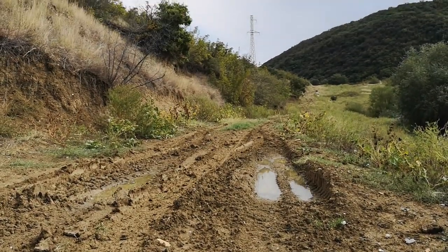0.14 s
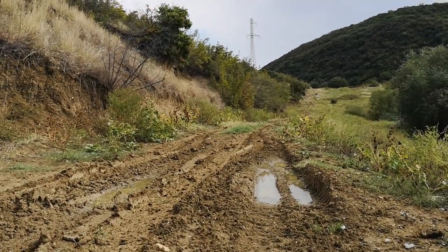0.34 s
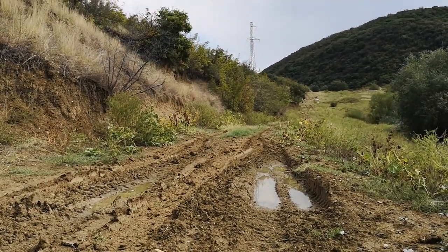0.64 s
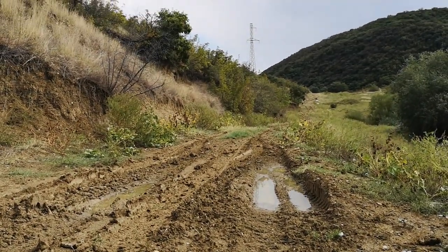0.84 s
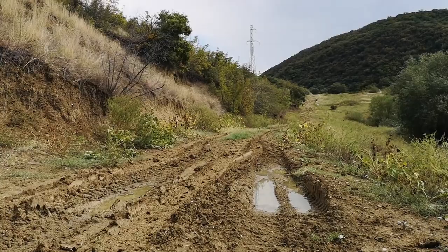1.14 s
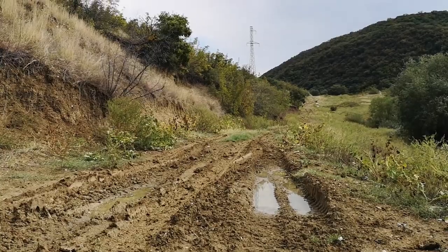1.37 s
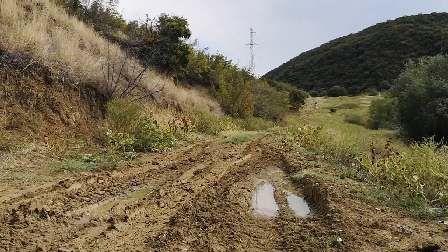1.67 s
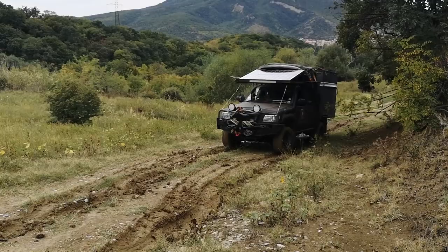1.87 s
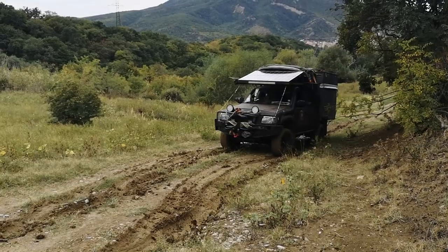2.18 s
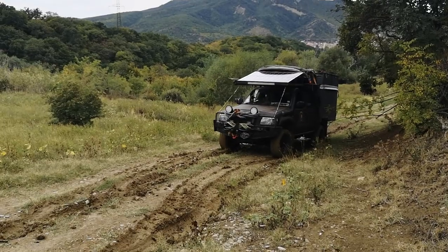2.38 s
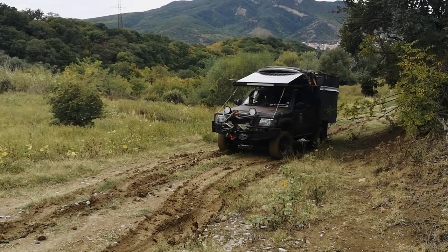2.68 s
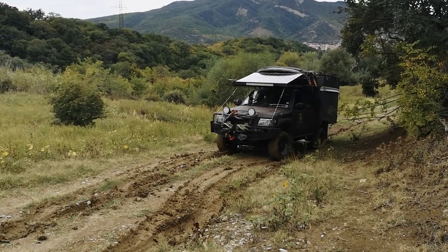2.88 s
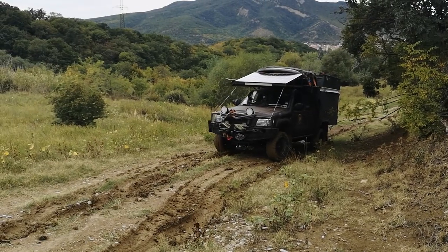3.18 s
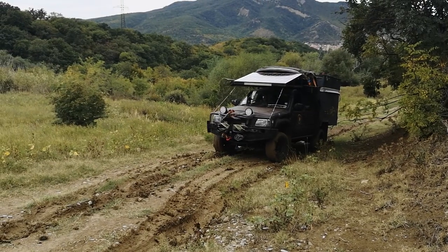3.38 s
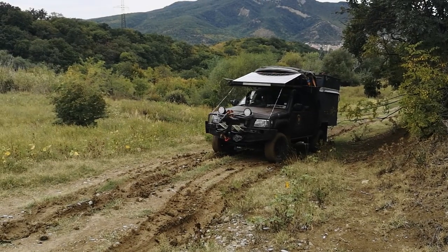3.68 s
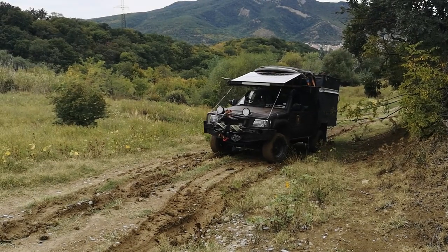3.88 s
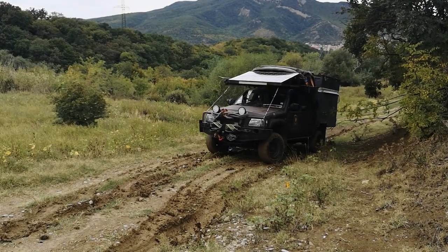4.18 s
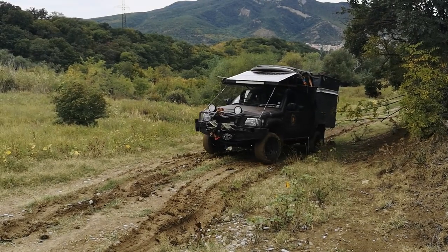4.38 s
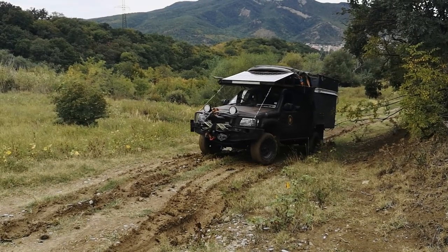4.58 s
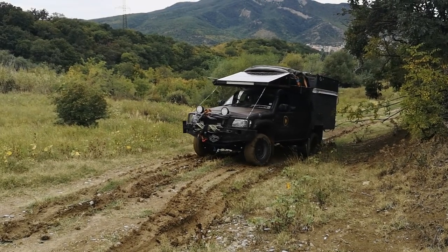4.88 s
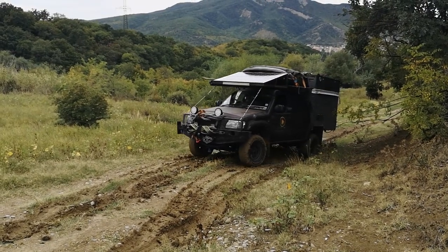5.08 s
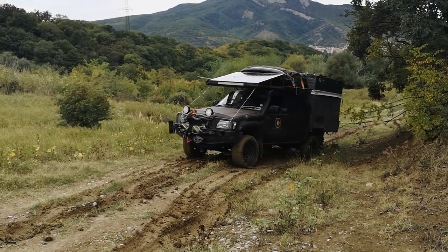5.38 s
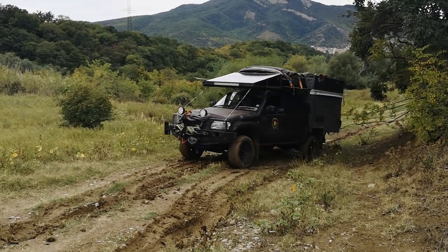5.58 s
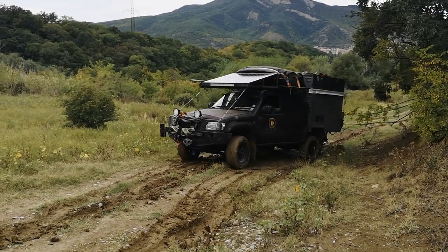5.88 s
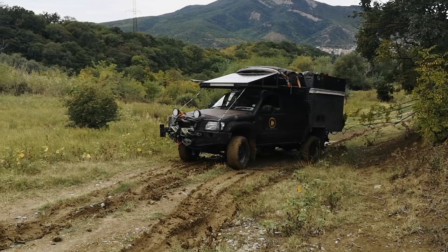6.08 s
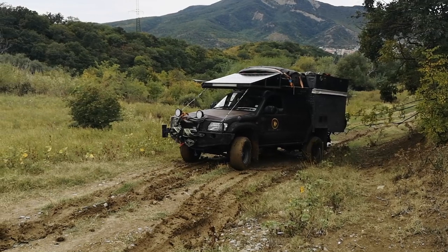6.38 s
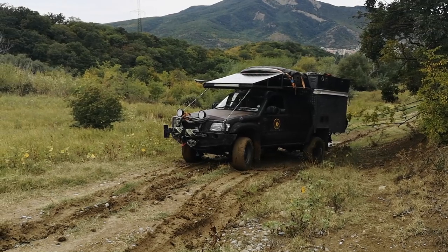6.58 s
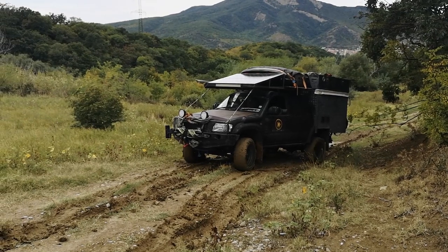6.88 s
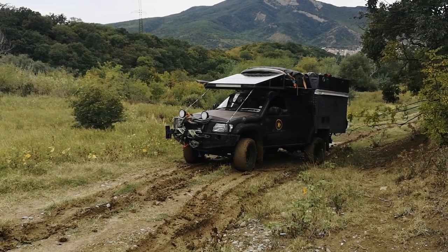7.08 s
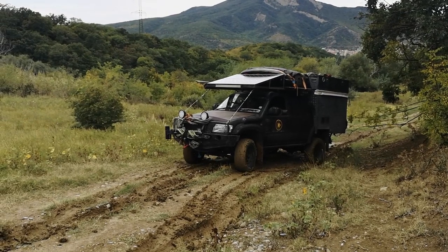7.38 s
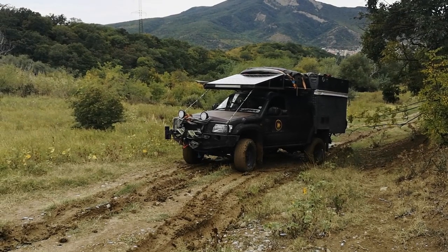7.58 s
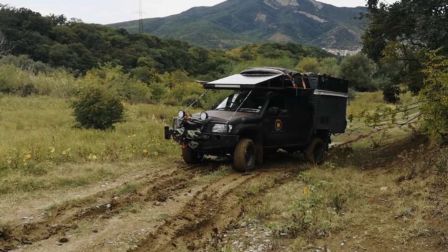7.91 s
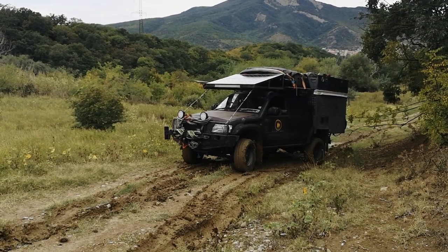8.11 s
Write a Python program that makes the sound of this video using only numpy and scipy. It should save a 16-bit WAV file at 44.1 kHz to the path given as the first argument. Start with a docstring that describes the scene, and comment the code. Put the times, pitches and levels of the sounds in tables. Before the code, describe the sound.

Crickets chirp rapidly in a quiet hill meadow, with a faint distant bird and soft gusts on the microphone. After about two seconds the meadow cuts off and a diesel truck fades in, rumbling and knocking as it labours along a muddy track. Midway its suspension squeaks and scrapes sharply, then small twigs snap under the wheels. The engine sags, picks up again and drops at the end, over low wind buffeting.

```python
"""Crickets chirp in a hill meadow, with a far bird and gusts on the microphone. At 1.9 s the meadow stops
and a diesel truck fades in, labouring through muddy ruts. Wing strokes and bird notes are gliding sines.
The firing rate drives exhaust tones, combustion knock, valve ticks and gear whine, over a noise rumble.
The suspension sticks and slips in squeaks and scrapes; twigs snap under the wheels."""
import sys
import numpy as np
from scipy import signal
from scipy.fft import rfft, irfft
from scipy.io import wavfile
from scipy.ndimage import uniform_filter1d

SR = 44100
rng = np.random.default_rng(int(sys.argv[2]) if len(sys.argv) > 2 else 0)


def dump_mix(stems):
    """Bounce the given channels to the path in sys.argv[1] as a 16-bit WAV at rate SR."""
    frames = np.atleast_2d(stems).T  # one column per channel
    limited = np.clip(frames, -1, 1)  # hard clip at full scale
    pcm = np.round(limited * 32767).astype(np.int16)
    wavfile.write(sys.argv[1], SR, pcm)


N = 363825
T = np.arange(N) / SR
HZ = np.maximum(np.arange(N // 2 + 1) * SR / N, 1)
MEADOW_END_S = 1.926

# Stereo image of each scene's noise. Each row: frequency in Hz, left-right correlation.
MEADOW_CORRELATION = [(60, 0.98), (160, 0.89), (440, -0.47), (1190, -0.18), (3240, -0.13), (8770, 0.04)]
TRUCK_CORRELATION = [(60, 0.97), (160, 1), (440, 0.9), (1190, 1), (2000, 0.88), (3240, 0.12), (8770, 0.03)]


def from_db(db):
    return 10 ** (np.asarray(db) / 20)


def unit_rms(x):
    return x / np.sqrt(np.mean(x ** 2) + 1e-20)


def in_time(rows):
    """One curve per column, interpolated over the seconds in the first."""
    times_s, *columns = np.transpose(rows)
    return [np.interp(T, times_s, column) for column in columns]


def at_hz(rows, hz=HZ):
    """Table interpolated over log frequency, by default at every FFT bin."""
    rows = np.array(rows)
    return np.interp(np.log(hz), np.log(rows[:, 0]), rows[:, 1])


def bell(centre_s, width_s):
    return np.exp(-((T - centre_s) / width_s) ** 2)


def drift(rate_hz):
    """Slow random wander, rms 1."""
    pole = np.exp(-80 * np.pi * rate_hz / SR)
    slow = signal.lfilter([1], [1, -2 * pole, pole * pole], rng.standard_normal(N // 40 + 2002))[2000:]
    return np.interp(np.arange(N) / 40, np.arange(len(slow)), unit_rms(slow))


def smooth_noise(shape, samples, passes=1):
    """White noise through moving averages."""
    noise = rng.standard_normal(shape)
    for _ in range(passes):
        noise = uniform_filter1d(noise, size=samples)
    return noise


def resonance(x, hz, *widths_hz):
    """Two-pole band-passes in series, one per width."""
    for width_hz in widths_hz:
        r = np.exp(-np.pi * width_hz / SR)
        gain = (1 - r * r) / 2
        x = signal.lfilter([gain, 0, -gain], [1, -2 * r * np.cos(2 * np.pi * hz / SR), r * r], x)
    return x


def stereo_noise(spectrum, correlation, gate=1):
    """Noise, gated and then coloured, partly correlated between the ears; mid rms 1."""
    mid, side = rfft(gate * rng.standard_normal((2, N))) * from_db(at_hz(spectrum))
    alike = np.clip(at_hz(correlation), -.99, .995)
    pair = irfft(np.sqrt(1 + alike) * mid + np.sqrt(1 - alike) * side * [[1], [-1]], N)
    return pair / np.std(pair.mean(0))


def note(start_s, length_s, hz, end_hz, db, rough, lean=0.54, arch=0., jitter=0.):
    """Slice and samples of a gliding sine. Lean over 1 peaks late; arch sags the pitch at both ends."""
    u = np.arange(int(length_s * SR)) / (length_s * SR)
    wobble = 1 + rough * unit_rms(smooth_noise(len(u), 70, passes=2))
    pitch_hz = (hz + (end_hz - hz) * u) * (1 - arch * (2 * u - 1) ** 2)
    pitch_hz *= 1 + jitter * unit_rms(smooth_noise(len(u), 120))
    tone = np.sin(2 * np.pi * np.cumsum(pitch_hz) / SR + rng.uniform(0, 5.5))
    first = max(int(start_s * SR), 0)
    return slice(first, first + len(u)), from_db(db) * np.sin(np.pi * u ** lean) * wobble * tone


def octave(tone, gain_db):
    """A squared tone, less its slow part, sounds an octave up."""
    return 2 * from_db(gain_db) * (tone ** 2 - uniform_filter1d(tone ** 2, size=18))


def slope_echo(x, samples, decay_s):
    """The hillside smears a call into a stereo tail."""
    response = rng.standard_normal((2, samples)) * np.exp(-np.arange(samples) / (decay_s * SR))
    return signal.fftconvolve(x[None], response)[:, :N]


def gust_gain(breeze_db):
    """Wind strength: a steady breeze plus bell-shaped gusts."""
    # Each row: centre in seconds, width in seconds, peak in dB.
    gusts = [(.08, 0.033, -49), (0.271, 0.042, -38), (.5, 0.074, -57), (0.633, 0.045, -38),
             (.8, 0.082, -51), (.99, 0.053, -48.5), (3.7, 0.35, -57.5), (4.6, 0.18, -44), (5.1, 0.14, -40),
             (5.6, 0.21, -39), (6.2, 0.073, -36), (7.0, 0.42, -44), (7.9, 0.29, -51), (8.22, 0.18, -29.5)]
    return from_db(breeze_db) + sum(from_db(db) * bell(s, width_s) for s, width_s, db in gusts)


def meadow_wind():
    """Wind buffets the microphone with a fluttering rumble."""
    # Each row: frequency in Hz, relative density in dB.
    spectrum = [(8, -17), (18, 13), (30, -6.5), (50, -0.5), (87, -10), (141, -33), (281, -60), (520, -74)]
    return gust_gain(breeze_db=-59) * from_db(2.2 * drift(12)) * stereo_noise(spectrum, MEADOW_CORRELATION)


def still_air():
    """Steady hush of air and a far insect chorus."""
    # Each row: frequency in Hz, relative density in dB.
    spectrum = [(88, -9), (150, -3.5), (420, -14), (980, -17.5), (1920, -15), (3220, -20.5), (4100, -21.5),
                (4600, -7), (5300, -23.5), (9220, -28.5), (12000, -33.5), (16000, -50)]
    return from_db(-70.5) * stereo_noise(spectrum, MEADOW_CORRELATION)


def near_cricket():
    """Each wing stroke is almost a sine, higher when stronger."""
    # Each row: last stroke of a chirp in seconds, base level in dB.
    chirps = [(0.16, -47.5), (0.5392, -45), (0.8194, -47.5), (1.1087, -49), (1.422, -48.5), (1.7286, -46.5),
              (2.009, -46)]
    # Each row: lead on the last stroke in seconds, gain in dB, octave relative to the stroke in dB.
    strokes = [(.108, -12, -15), (.074, -1.5, -36), (0.042, 2, -45), (0.0026, 2.5, -45)]
    out = np.zeros((2, N))
    for last_s, chirp_db in chirps:
        for lead_s, gain_db, octave_db in strokes:
            s, db = last_s - lead_s, chirp_db + gain_db
            hz = 4972 - (db + 42.5) ** 2
            span, stroke = note(s - .007, .023, hz * .992, hz * 1.004, db, rough=.06, lean=1.3, arch=.05)
            out[:, span] += stroke * from_db([[4.5], [-11]]) + octave(stroke, octave_db - db)
            span, wing_flutter = note(s - .004, .02, hz * .97, hz * .93, db - 13, rough=.55)
            out[:, span] += wing_flutter
    return out


def far_crickets():
    """Three singers; a chirp swells through four wing strokes, each falling in pitch."""
    # Each row: first chirp's end in seconds, period in seconds, pitch in Hz, level in dB,
    # swell in dB per second, left over right in dB.
    even_singers = [(.32, .346, 4640, -66.5, 4, 0.5), (0.175, .345, 4110, -72, -3.5, 11.5)]
    # A deep singer's uneven chirps. Each row: last stroke in seconds, level in dB.
    deep_chirps = [(.33, -70), (.615, -66), (.94, -66), (1.34, -71), (1.725, -72)]
    chirps = [(s, hz, db + swell_db_per_s * s + rng.normal(0, 3.1), pan_db)
              for first_s, period_s, hz, db, swell_db_per_s, pan_db in even_singers
              for s in np.arange(first_s, MEADOW_END_S + period_s, period_s)]
    chirps += [(s, 3930, db, 0) for s, db in deep_chirps]
    out = np.zeros((2, N))
    for last_s, hz, db, pan_db in chirps:
        for back in range(4):
            start_s, stroke_db = last_s - .014 - .0385 * back, db - .38 * back ** 2
            span, stroke = note(start_s, .0374, hz * 1.035, hz * .955, stroke_db, rough=.6, jitter=.008)
            if hz < 4300:
                stroke += octave(stroke, -14 - db)
            out[:, span] += stroke * from_db([[pan_db / 2], [-pan_db / 2]])
    return out


def bird():
    """Raspy whistles glide to a turning pitch and on, echoing off the slope."""
    # Each row: start and length in seconds, start, turning and end pitch in Hz, level in dB.
    notes = [(0.107, 0.079, 2020, 3530, 2510, -69), (0.252, 0.064, 1990, 3550, 2680, -67),
             (0.605, 0.029, 3050, 2830, 2720, -69), (0.626, 0.062, 2390, 2720, 2610, -69.5),
             (0.841, 0.08, 3060, 2860, 2800, -74), (0.91, 0.041, 2360, 2640, 2730, -73)]
    turn_share = .68
    song = np.zeros(N)
    for start_s, length_s, hz, turn_hz, end_hz, db in notes:
        u = np.clip((T - start_s) / length_s, 0, 1)
        early_hz = hz + (turn_hz - hz) * (u / turn_share) ** 2.2
        late_hz = np.interp(u, [turn_share, 1], [turn_hz, end_hz])
        phase = 2 * np.pi * np.cumsum(np.where(u < turn_share, early_hz, late_hz)) / SR
        song += from_db(db) * np.sin(np.pi * u) ** .11 * np.sin(phase)
    song *= 1 + .4 * unit_rms(smooth_noise(N, 150))   # rasp
    return from_db([[-5], [1.5]]) * song + from_db(-31) * slope_echo(song, 6000, decay_s=.06)


def meadow():
    """Wind, air, crickets and bird, stopping abruptly."""
    air = meadow_wind() + still_air()
    crickets = near_cricket() + far_crickets()
    echo = from_db([[-50], [-57]]) * slope_echo(crickets.mean(0), 8000, decay_s=.05)
    crickets[0] = np.roll(crickets[0], 25)   # later on the left
    return (air + crickets + echo + bird()) * np.clip((MEADOW_END_S - T) / .0046, 0, 1)


def exhaust_dip_db():
    """The exhaust tones sink in level for moments."""
    # Each row: centre in seconds, width in seconds, dip in dB.
    dips = [(3.2, 0.33, -4.5), (4.2, 0.46, -1.5), (5.9, 0.21, -8), (7.6, 0.27, -6), (8.2, 0.11, -6)]
    return sum(db * bell(s, width_s) for s, width_s, db in dips)


def exhaust(firing_hz, firings, rumble_db):
    """Sines on the firing rate; each wavers in level and phase because no two firings are alike."""
    # Orders from uneven cylinders. Each row: multiple of the firing rate, relative level in dB.
    uneven_orders = [(1.249, -27), (1.75, -24), (2.25, -16), (3.25, -21), (4, -11), (4.25, -16), (5, -20.5)]
    # Each row: time in seconds, rms levels in dB of orders 2.75, 3 and 3.75.
    upper_levels = [(2.2, -50, -54, -43), (2.7, -51, -54, -54), (3.1, -47, -53, -47), (3.9, -46, -49, -51),
                    (4.6, -52, -45, -45), (5.2, -55, -44, -46), (5.88, -53, -52, -43), (6.1, -50, -45, -55),
                    (6.5, -48, -44, -55), (7.3, -48, -46, -47), (8.1, -54, -52, -54)]
    # Pipe response for orders 1 and 2. Each row: frequency in Hz, rms level in dB before the dips.
    pipe_response = [(48, -44), (57, -34.5), (62, -36.5), (70, -36.5), (73, -42.5), (75.5, -62),
                     (100, -35.5), (118, -37.5), (128, -35), (138, -36.5), (146, -39.5), (152, -34)]

    def order(k, db, waver_db):
        amplitude = np.sqrt(2) * from_db(db + waver_db * drift(5))
        return amplitude * np.sin(2 * np.pi * k * firings + .25 * drift(3))

    dip_db = exhaust_dip_db()
    uneven = sum(order(k, rumble_db + db - 5 + dip_db / 2, waver_db=3) for k, db in uneven_orders)
    upper = sum(order(k, db, waver_db=2) for k, db in zip((2.75, 3, 3.75), in_time(upper_levels)))
    main = sum(order(k, at_hz(pipe_response, k * firing_hz) + dip_db, waver_db=1) for k in (1, 2))
    return uneven + upper + main


def rumble(level_db):
    """Low engine noise that wavers and sinks a little with the exhaust tones."""
    # Each row: frequency in Hz, relative density in dB.
    spectrum = [(21, -21), (35, -5), (92, -0.5), (145, 1), (284, -6.5), (313, -10), (373, -22.5),
                (435, -60.5), (480, -23), (620, -46.5), (1060, -120)]
    gain = from_db(level_db + .3 * exhaust_dip_db() + 1.28 * drift(6.2))
    return gain * stereo_noise(spectrum, TRUCK_CORRELATION)


def track_wind():
    """A stronger, very deep breeze on the microphone."""
    # Each row: frequency in Hz, relative density in dB.
    spectrum = [(10, 0), (22, 0), (40, -4.5), (70, -30), (200, -75.5)]
    gain = gust_gain(breeze_db=-38) * from_db(1.3 * drift(2.2))
    return gain * stereo_noise(spectrum, TRUCK_CORRELATION)


def block_ring(knock, count):
    """Knock and a sharp pulse per firing ring the block; the pulses alone make the sump hum."""
    # Each row: frequency in Hz, width in Hz, gain in dB.
    modes = [(727.5, 27, -6.5), (776, 25, -5), (1581, 51, -11.5), (1660, 63, -1), (1755, 78, 1),
             (1856, 78, -3.5), (2010, 170, -16.5)]
    pulses = np.diff(count, prepend=0) * np.array([1, .6, .75, .55])[count % 4]   # cylinders differ
    drive = knock + from_db(17) * unit_rms(pulses)
    block = sum(from_db(db + 1.3 * drift(3.4)) * resonance(drive, hz, width_hz, 3 * width_hz)
                for hz, width_hz, db in modes)
    sump = unit_rms(resonance(pulses, 657, 260, 260))
    return block + from_db(-17.5) * sump


def valve_ticks(count, strength):
    """A valve ticks every fourth firing; looser parts rattle at random."""
    ticks = np.diff((count + 1) // 4, prepend=0)
    rattle = rng.random(N) < 90 / SR
    hits = strength * (ticks + .5 * rattle) + 1e-18
    ring = resonance(hits, 3328, 77.8, 340) + .41 * resonance(resonance(hits, 3440, 90), 3640, 500)
    ring += sum(.38 * resonance(hits, hz, 90, 300) for hz in (3850, 4320))
    return unit_rms(ring)


def diesel_clatter(firings, knock_db, ring_db, hiss_db, valve_db):
    """Each combustion is a burst of knock and hiss, joined by block ring and valve ticks."""
    # Each row of both: frequency in Hz, relative density in dB.
    knock_spectrum = [(240, -35), (400, -3), (439, -10.5), (620, -1), (722, 1.5), (833, -1.5), (1280, -3),
                      (1720, 3), (3000, -7), (3900, -36), (6600, -120)]
    hiss_spectrum = [(1530, -8.5), (2600, -4), (3060, -6.5), (3480, 2), (3640, -10), (3850, -0.5),
                     (4160, -10), (4320, -3), (5200, -7), (5330, -7.5), (5520, -6), (6200, -12.5),
                     (6960, -3.5), (7660, -2.5), (8120, -5.5), (9300, -21), (10500, -32.5), (15500, -30)]
    count = firings.astype(int)
    strength = from_db(1.07 * rng.standard_normal(count[-1] + 1))[count]
    strength *= from_db(1.8 * (count % 4 == 0))   # one cylinder knocks harder
    bursts = .96 * strength * np.exp(-(firings % 1) / 1.15)
    knock = stereo_noise(knock_spectrum, TRUCK_CORRELATION, gate=1 + bursts)
    ring = from_db(ring_db) * block_ring(knock, count)
    valve = from_db(valve_db) * valve_ticks(count, strength)
    flicker = from_db(3.5 * np.clip(drift(36), -2, 2))
    hiss = stereo_noise(hiss_spectrum, TRUCK_CORRELATION, gate=1 + .5 * bursts * flicker)
    return from_db(knock_db) * knock + ring + valve + from_db(hiss_db) * hiss


def gear_whine(firings, high_db):
    """Teeth mesh at multiples of the firing rate: one high whine, and lower ones that swell and fade."""
    # Each row: centre in seconds, width in seconds, tooth contacts per firing, peak in dB.
    low_whines = [(3.3, .5, 11, -60), (3.85, .4, 10, -54), (4.75, .3, 9.75, -54), (5.95, .1, 9.5, -59)]
    whines = [(19.9, from_db(high_db))]
    whines += [(contacts, from_db(db) * bell(s, width_s)) for s, width_s, contacts, db in low_whines]
    return sum(gain * from_db(1.5 * drift(6)) * np.sin(2 * np.pi * contacts * (firings + .003 * drift(15)))
               for contacts, gain in whines)


def driveline_whine():
    """The turning driveline sings one wavering tone."""
    # Each row: time in seconds, pitch in Hz, level in dB.
    course = [(2.1, 570, -72), (2.45, 589, -56), (2.8, 609, -60), (3, 620, -80), (3.8, 627, -72),
              (4.0, 630, -57), (4.2, 635, -45), (4.4, 641, -54), (4.5, 644, -64), (4.9, 648, -62),
              (5.2, 652, -54), (5.5, 636, -57), (5.7, 620, -78), (6.9, 620, -78), (7.1, 642, -57),
              (7.35, 678, -57), (7.6, 660, -55), (8.0, 615, -72)]
    hz, db = in_time(course)
    return from_db(db + drift(6)) * np.sin(2 * np.pi * np.cumsum(hz) / SR + .3 * drift(8))


def suspension_scrape():
    """Uneven slips: rubbing noise through resonances, and a screech that wanders in pitch."""
    # Each row: time in seconds, rubbing level in dB.
    rub_levels = [(4.6, -110), (4.85, -60), (5.0, -41.5), (5.15, -52), (5.3, -34), (5.45, -45), (5.62, -43),
                  (5.75, -58), (5.9, -110)]
    # Each row: frequency in Hz, width in Hz, gain in dB.
    modes = [(6820, 400, 0), (8100, 310, -3.5), (5150, 130, -4), (5320, 180, -4), (2510, 110, 10),
             (9360, 500, -8.5), (10200, 400, -13.5), (11700, 500, -21.5), (12700, 900, -21),
             (13800, 800, -27), (1307, 250, 6.5)]
    # Each row: time in seconds, pitch in Hz, level in dB.
    screech_course = [(4.86, 6600, -75), (4.92, 6650, -52), (5.05, 6900, -49.5), (5.12, 7250, -38),
                      (5.16, 7800, -42), (5.2, 7300, -42.5), (5.25, 7020, -48), (5.29, 7450, -55),
                      (5.36, 7520, -56), (5.41, 7600, -65), (5.51, 7700, -59), (5.58, 7500, -49),
                      (5.64, 7750, -50), (5.72, 7700, -69)]
    rub = from_db(in_time(rub_levels)[0]) * rng.standard_normal(N)
    screech_hz, screech_db = in_time(screech_course)
    slips = smooth_noise((2, N), 55, passes=2)
    phase = 2 * np.pi * np.cumsum(screech_hz) / SR
    noise_band = unit_rms(slips[0] * np.sin(phase) + slips[1] * np.cos(phase))
    screech = from_db(screech_db + 4 * drift(30)) * noise_band
    return screech + sum(from_db(db + 3 * drift(18)) * resonance(rub, hz, width_hz, width_hz)
                         for hz, width_hz, db in modes)


def suspension_squeaks():
    """Rubber and steel stick and slip: short rough tones with four partials, coloured by the springs."""
    # Each row: start and length in seconds, start and end pitch in Hz, base level in dB.
    squeaks = [(4.899, 0.39, 2250, 2460, -54), (5.058, 0.067, 3430, 3430, -43),
               (5.085, 0.06, 1880, 1950, -38), (5.105, 0.035, 4760, 4760, -38.5),
               (5.107, 0.066, 3730, 3950, -36.5), (5.149, 0.042, 3870, 3930, -26),
               (5.181, 0.044, 4880, 4600, -46), (5.182, 0.093, 3930, 3830, -38),
               (5.204, 0.089, 1887, 1978, -40), (5.235, 0.04, 3530, 3470, -33),
               (5.258, 0.027, 2560, 2540, -53), (5.323, 0.078, 1875, 1965, -37.5),
               (5.327, 0.047, 3960, 3730, -55), (5.343, 0.24, 3080, 3020, -39),
               (5.517, 0.049, 4010, 4060, -33.5), (5.556, 0.06, 3750, 3680, -35.5),
               (5.579, 0.047, 3540, 3530, -38), (5.624, 0.088, 3940, 3880, -31)]
    # Each row: frequency in Hz, gain in dB.
    spring_response = [(1900, -4.5), (2550, 10), (3550, -32), (4000, -11), (4750, 2), (5100, -6),
                       (5750, -12), (7000, -9.5), (7800, -3.5), (8100, -23), (9400, -16.5), (11700, -34.5),
                       (12400, -23), (14500, -40), (16000, -55)]
    out = np.zeros(N)
    for start_s, length_s, hz, end_hz, db in squeaks:
        for k in (1, 2, 3, 4):
            level_db = db + at_hz(spring_response, k * hz)
            span, tone = note(start_s, length_s, k * hz, k * end_hz, level_db, rough=.6, jitter=.0033 * k)
            out[span] += tone
    return out


def twig_snaps():
    """Twigs and grit snap under the wheels in bright noise bursts."""
    # Each row: start in seconds, relative level in dB.
    snaps = [(5.641, -36), (5.743, -36.5), (5.7994, -45), (5.852, -43), (5.901, -40), (6.0496, -38.5),
             (6.2405, -36.5), (6.3232, -41), (6.361, -43), (6.6753, -38.5), (7.0276, -40), (7.099, -40),
             (7.903, -42.5)]
    decay_s, band_makeup_db = .0041, 12
    clicks = np.zeros(N)
    for start_s, db in snaps:
        clicks[int(start_s * SR)] = from_db(db + band_makeup_db)
    envelope = signal.lfilter([1], [1, -np.exp(-1 / (decay_s * SR))], clicks + 1e-18)
    bursts = envelope * rng.standard_normal(N)
    bright = resonance(resonance(bursts, 7500, 1500, 1500), 7200, 2200)
    return bright + from_db(-28) * resonance(bursts, 5000, 2500, 2500)


def truck():
    """The truck fades in, its engine following speed and load; the left ear gets far more treble."""
    # Each row: time in seconds, firing rate in Hz.
    engine_speed = [(1.93, 57), (2.3, 60.5), (2.9, 66.5), (3.5, 68.6), (4.0, 71.6), (4.5, 73.7),
                    (5.0, 75.5), (5.3, 76), (5.45, 74.5), (5.6, 69), (5.8, 64), (5.93, 60.5), (6.04, 56.3),
                    (6.5, 58.9), (6.75, 60.8), (6.9, 64), (7.14, 70.5), (7.35, 73.8), (7.5, 73.5),
                    (7.7, 69.5), (8, 52), (8.25, 44)]
    # Each row: time in seconds, knock level in dB, block ring gain in dB.
    engine_load = [(1.93, -49.5, -50), (2.8, -47.5, -52.5), (3.6, -47, -52), (4.2, -45.5, -46.5),
                   (4.6, -45.5, -43.5), (4.95, -45, -42), (5.3, -46.5, -52.5), (5.6, -46, -53.5),
                   (6.2, -47.5, -51.5), (6.8, -46.5, -45.5), (7.3, -45, -47), (7.8, -45.5, -50),
                   (7.87, -48.5, -65), (8.25, -54, -64)]
    # Each row: time in seconds, high whine level in dB, valve tick level in dB.
    whine_and_valve = [(1.93, -66, -56), (2.6, -72, -60), (3.15, -66, -51), (3.5, -58, -55),
                       (3.9, -63, -66), (4.3, -57, -69.5), (4.7, -66, -66), (5.3, -68, -60),
                       (5.7, -57, -56.5), (6.1, -53.5, -56), (6.47, -56, -66), (6.56, -72, -75),
                       (6.9, -58, -61), (7.05, -68, -68), (7.4, -63, -59), (7.7, -70, -60),
                       (8.25, -76, -102)]
    # Each row: frequency in Hz, left over right in dB.
    left_balance = [(200, 0), (410, -1.5), (600, 4.5), (1000, 1.5), (1890, -3), (2780, 8), (4070, 7),
                    (5980, 22.5), (8500, 19), (10500, 1.5)]
    # Each row: frequency in Hz, phase lead of the left in radians.
    left_lead = [(100, 0), (520, 0.44), (860, 0.5), (1890, 0.39), (2150, 1.5), (2580, 0.97), (3100, -0.3),
                 (3960, 1.5), (4310, 4), (5600, -1), (6720, 7), (7490, 8), (8350, 3), (8960, 9), (12000, 8)]
    mean_load_db, rumble_rise_db_per_s, fade_in_s = -47.5, .74, .99
    firing_hz = uniform_filter1d(in_time(engine_speed)[0], size=4000)   # flywheel inertia
    firings = np.cumsum(firing_hz) / SR
    knock_db, ring_db = in_time(engine_load)
    whine_db, valve_db = in_time(whine_and_valve)
    swing_db = knock_db - mean_load_db
    rumble_db = -39 + .55 * swing_db + rumble_rise_db_per_s * (T - MEADOW_END_S)
    hiss_db = -53.5 + .99 * swing_db
    mono = gear_whine(firings, whine_db) + driveline_whine() + exhaust(firing_hz, firings, rumble_db)
    mono += suspension_squeaks() + suspension_scrape() + twig_snaps()
    wide = rumble(rumble_db) + track_wind() + diesel_clatter(firings, knock_db, ring_db, hiss_db, valve_db)
    left = from_db(at_hz(left_balance))
    ears = np.array([left * np.exp(1j * at_hz(left_lead)), np.ones_like(left)])
    ears *= np.sqrt(2 / (1 + left ** 2))   # constant power
    return irfft(rfft(mono + wide) * ears, N) * np.clip((T - MEADOW_END_S) / fade_in_s, 0, 1)


def scene():
    return meadow() + truck()


def record(dry):
    """Steep low-pass, 70 dB down at 16 kHz."""
    return signal.sosfilt(signal.cheby2(12, 70, 16000, fs=SR, output="sos"), dry)


dry = scene()
out = record(dry)
dump_mix(out)
```